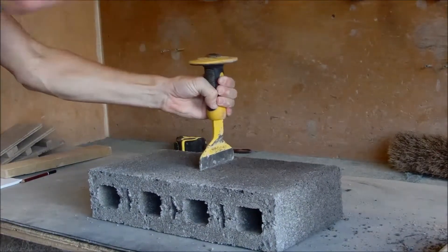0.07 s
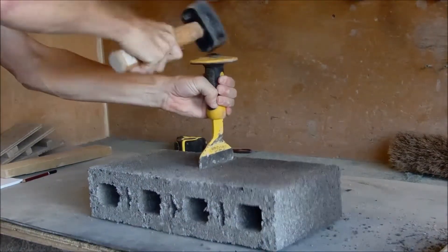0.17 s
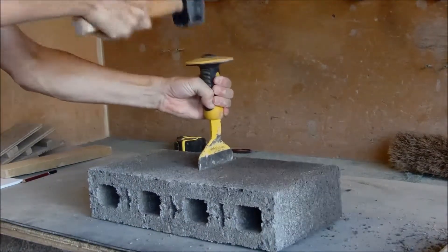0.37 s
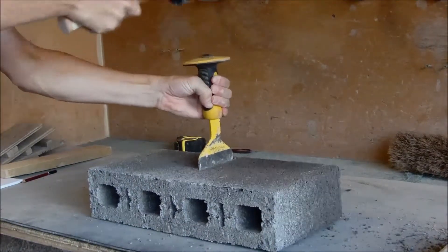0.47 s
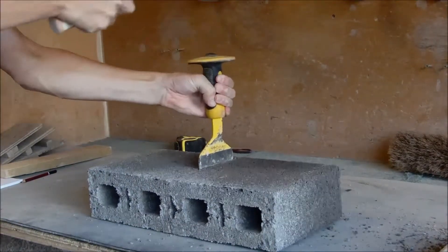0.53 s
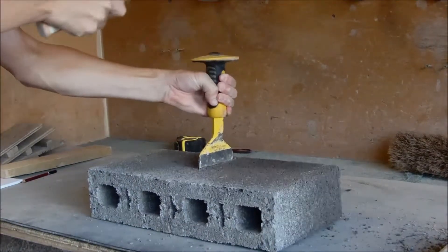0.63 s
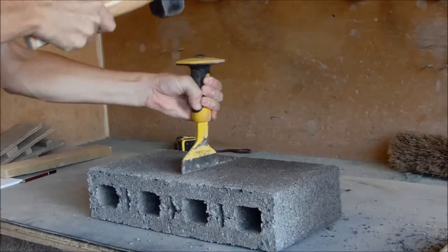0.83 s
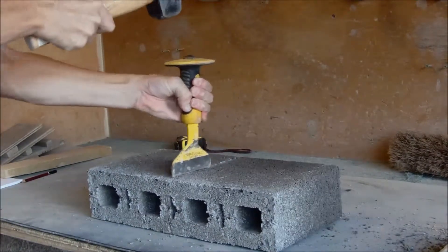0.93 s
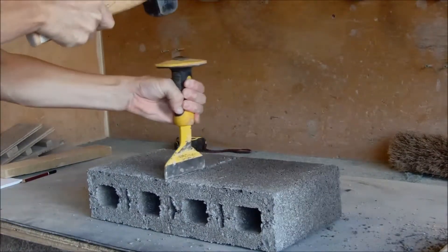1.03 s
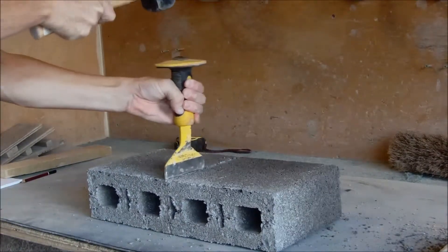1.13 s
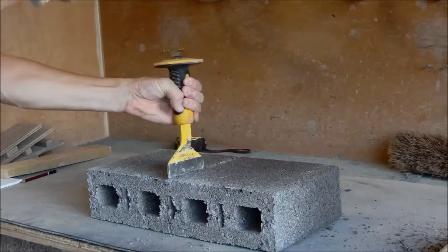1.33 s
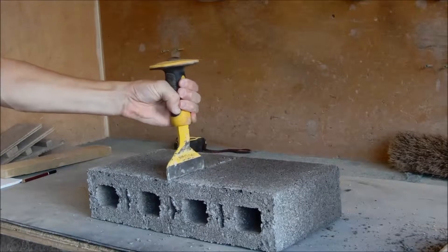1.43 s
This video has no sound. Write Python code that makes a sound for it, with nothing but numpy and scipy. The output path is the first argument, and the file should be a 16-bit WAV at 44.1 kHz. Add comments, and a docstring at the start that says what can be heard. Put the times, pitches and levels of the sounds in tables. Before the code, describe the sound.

One loud hammer blow on a chisel set against concrete cuts into the fading echo of an earlier hit. It rings and dies away in a bare workshop, followed by a faint blade scrape and soft ticks.

```python
"""The dying echo of a hammer blow fills a bare workshop. Then the club hammer drives a steel chisel
into a hollow concrete block again: a crack, a short crunch, the ring of block and chisel,
and a long wash from the room. The blade scrapes faintly as it is moved along.
A few dull ticks follow, over room air and a low hum."""
import sys
import numpy as np
from scipy import signal
from scipy.fft import rfft, irfft
from scipy.io import wavfile

SR = 44100
rng = np.random.default_rng(int(sys.argv[2]) if len(sys.argv) > 2 else 0)


def materialize(psi):
    """Save the field psi as 16-bit PCM at rate SR to the path in sys.argv[1].

    A 1-D psi becomes a single channel; in a 2-D psi each row is a channel.
    """
    bounded = np.clip(np.atleast_2d(psi).T, -1, 1)
    quanta = np.round(bounded * 32767).astype(np.int16)
    wavfile.write(sys.argv[1], SR, quanta)


N = 66150
T = np.arange(N) / SR
BIN_HZ = np.fft.rfftfreq(N, 1 / SR)


# hammer blows: (time [s], gain [dB], ring gain [dB], low-pass cutoff [Hz])
BLOWS = [(-0.2, -10.5, -8, 9000), (0.2145, 1.5, -1, 19200)]

def hammer_blows():
    """Each blow has its own level, ring and brightness; the earlier one is duller."""
    blows = np.zeros(N)
    for start_s, db, ring_db, cutoff_hz in BLOWS:
        age = np.maximum(T - start_s, 0)
        blow = reflections(age) + strike(age, ring_db) + wash(age)
        blows += from_db(db) * signal.lfilter(*signal.butter(1, cutoff_hz, fs=SR), blow)
    return blows


# block and chisel modes: (frequency [Hz], relative level [dB], t60 [s])
BLOCK_CHISEL_MODES = [(692.7, -9.5, 0.062), (737.6, -23, .45), (777, -26.5, 0.54), (888, -20.5, .09),
                      (1025.6, -26, 0.24), (1052, -25.5, 0.36), (1410, -24.5, .22), (1645, -27, .28),
                      (1704, -35.5, .85), (1706, -41, .6), (2020, -37.5, 0.23), (2480, -22.5, 0.086),
                      (2890, -28, .22), (4130, -28, 0.068)]

def strike(age, ring_db):
    """Crack, crunch and the ring of block and chisel."""
    impact = crack(age) + crunch(age) + from_db(ring_db) * ring(BLOCK_CHISEL_MODES, age)
    highpass = signal.butter(2, 290, "high", fs=SR, output="sos")
    return signal.sosfilt(highpass, impact)


# blade bites: (delay [s], relative level [dB])
BITES = [(0.0002, 3), (.0043, -5), (0.0133, -5.5), (0.0162, -8)]
# contact modes: (frequency [Hz], relative level [dB], t60 [s])
CRACK_MODES = [(414, -23.5, 0.036), (1136, -1.5, 0.0045), (2044, -5.5, 0.0056), (3450, -10, .005),
               (5690, -11, 0.0041), (9500, -19, 0.0058)]

def crack(age):
    """The blade bites and judders; each bite excites heavily damped contact modes."""
    bites = np.zeros(N)
    for delay_s, db in BITES:
        bite_age = np.maximum(age - delay_s, 0)
        bites += from_db(db) * rise(bite_age, rise_s=0.00075) * ring(CRACK_MODES, bite_age)
    return bites


# noise bursts: (delay [s], hold [s], relative level [dB])
BURSTS = [(.0005, 0.0014, -16.5), (.0042, 0.0026, -25.5), (0.0107, 0.006, -20), (0.042, 0.0039, -28.5)]
# crunch spectrum: (frequency [Hz], relative density [dB])
CRUNCH_SPECTRUM = [(60, -43), (200, -20), (380, -22), (540, 6), (760, 8), (1250, -2), (1800, 4), (3300, 3),
                   (4600, -13.5), (6600, -6.5), (7900, -19), (9400, -19.5), (11500, -26), (16000, -31)]

def crunch(age):
    """Short noise bursts: the crunch of the blow, then a faint echo off the wall."""
    envelope = sum(from_db(db) * swell(age - delay_s, rise_s=0.0003, hold_s=hold_s, fall_s=0.0034)
                   for delay_s, hold_s, db in BURSTS)
    return envelope * noise(CRUNCH_SPECTRUM)


# reflection spectrum: (frequency [Hz], relative density [dB])
REFLECTION_SPECTRUM = [(50, -40.5), (100, -4), (220, -8.5), (320, -6), (420, -2.5), (560, -11.5),
                       (740, 6.5), (1250, -4), (1700, 4), (2200, -3.5), (2800, 3), (4600, -12),
                       (6600, -10.5), (9400, -20), (11500, -28.5), (16000, -32)]

def reflections(age):
    """First reflections from bench and walls, blurred into one swell of noise."""
    envelope = swell(age, rise_s=0.05, hold_s=0.057, fall_s=0.024)
    return from_db(-19) * envelope * noise(REFLECTION_SPECTRUM)


# reverberation spectrum: (frequency [Hz], relative density [dB])
WASH_SPECTRUM = [(50, -51), (120, -17.5), (300, -14), (450, -6.5), (620, -6.5), (700, 2.5), (770, 3.5),
                 (880, -6.5), (1030, -2), (1250, -8.5), (1540, -7.5), (1720, -0.5), (1900, -13),
                 (2750, -2.5), (3600, -7), (4600, -15), (6600, -17.5), (8200, -25), (9500, -24.5),
                 (11500, -34), (16000, -36)]
# room decay: (band centre [Hz], t60 [s])
ROOM_T60 = [(100, 0.94), (400, 1), (800, 0.95), (1800, 1), (3200, 0.92), (6000, 0.81), (9000, 0.61),
            (15000, .63)]

def wash(age):
    """Diffuse reverberation: overlapping bands, each dying at the room's rate for its pitch."""
    spectrum = rfft(noise(WASH_SPECTRUM))
    centres_hz, t60s = np.transpose(ROOM_T60)
    tail = np.zeros(N)
    for weights, t60 in zip(np.eye(len(centres_hz)), t60s):
        band_gain = at_hz(np.c_[centres_hz, weights], BIN_HZ)
        tail += irfft(spectrum * band_gain, N) * from_db(-60 * age / t60)
    return from_db(-22.5) * rise(age, rise_s=0.017) * tail


# blade-on-block spectrum: (frequency [Hz], relative density [dB])
SCRAPE_SPECTRUM = [(250, -24), (480, 3.5), (750, 6), (1200, 2), (1500, 0), (1750, 6.5), (2100, -2),
                   (3200, -7), (3650, -1.5), (4300, -20), (7000, -20.5), (7600, -14), (8100, -20.5),
                   (16000, -59)]
# blade modes: (frequency [Hz], level [dB], t60 [s])
BLADE_MODES = [(750, -65, 0.9), (1421, -61, .3), (1670, -63.5, 0.74), (2000, -61, 0.18),
               (3597, -61.5, 0.27), (3940, -68, 0.26), (7690, -72, .35)]

def scrape(peak_s=0.91, sigma_s=0.15, catch_s=0.962, catch_fall_s=0.0094):
    """The blade slides along: a soft rasp that swells and fades, with one ringing catch."""
    slide = from_db(-59) * np.exp(-0.5 * ((T - peak_s) / sigma_s) ** 2)
    age = np.maximum(T - catch_s, 0)
    onset = rise(age, rise_s=0.0076)
    catch = from_db(-55) * onset * np.exp(-age / catch_fall_s)
    return (slide + catch) * noise(SCRAPE_SPECTRUM) + onset * ring(BLADE_MODES, age)


# ticks: (time [s], level [dB])
TICKS = [(1.109, -51.5), (1.191, -50.5), (1.322, -51), (1.404, -56)]

def ticks():
    """Faint dull ticks, each a sudden step that relaxes."""
    return sum(from_db(db) * hold_and_fall(T - start_s, hold_s=0, fall_s=0.018) for start_s, db in TICKS)


# room air spectrum: (frequency [Hz], relative density [dB])
AIR_SPECTRUM = [(10, 19.5), (30, 6), (70, 1), (150, -4), (310, -6), (420, -2.5), (800, -2.5), (1600, -7),
                (3200, -12), (4600, -17.5), (7000, -25.5), (8500, -31), (16000, -37)]
# hum tones: (frequency [Hz], rms level [dB])
HUM_TONES = [(386, -72.5), (500, -74), (770, -82.5)]

def background():
    """Room air and a faint steady hum."""
    hum = sum(from_db(db) * np.sqrt(2) * np.sin(2 * np.pi * (hz * T + rng.random()))
              for hz, db in HUM_TONES)
    return from_db(-61) * noise(AIR_SPECTRUM) + hum


def from_db(db):
    """Decibels to gain."""
    return 10 ** (np.asarray(db) / 20)


def at_hz(points, hz):
    """Table lookup on a log-frequency axis."""
    points_hz, values = np.transpose(points)
    return np.interp(np.log(np.maximum(hz, 1)), np.log(points_hz), values)


def noise(spectrum):
    """Coloured noise, rms 1."""
    white = rfft(rng.standard_normal(N))
    coloured = irfft(white * from_db(at_hz(spectrum, BIN_HZ)), N)
    return coloured / coloured.std()


def ring(modes, age):
    """Damped sines set off together, with alternating signs."""
    return sum((-1) ** k * from_db(db - 60 * age / t60) * np.sin(2 * np.pi * hz * age)
               for k, (hz, db, t60) in enumerate(modes))


def rise(age, rise_s):
    """Envelope: exponential approach from 0 to 1."""
    return 1 - np.exp(-np.maximum(age, 0) / rise_s)


def hold_and_fall(age, hold_s, fall_s):
    """Envelope: step, hold, exponential decay."""
    return (age > 0) * np.exp(-np.maximum(age - hold_s, 0) / fall_s)


def swell(age, rise_s, hold_s, fall_s):
    """Envelope: rise, then exponential decay from hold_s on."""
    return rise(age, rise_s) * hold_and_fall(age, hold_s, fall_s)


def scene():
    """Blows, scrape, ticks and background, in mono."""
    return (hammer_blows() + scrape() + ticks() + background())[None]


# microphone dips: (frequency [Hz], width [Hz])
MIC_DIPS = [(3950, 75), (7850, 420)]

def record(dry, cutoff_hz=15900):
    """Microphone response: two narrow dips and a steep treble cut."""
    for hz, width_hz in MIC_DIPS:
        dry = signal.lfilter(*signal.iirnotch(hz, hz / width_hz, fs=SR), dry)
    lowpass = signal.ellip(10, 0.2, 80, cutoff_hz, fs=SR, output="sos")
    return signal.sosfilt(lowpass, dry)


dry = scene()
out = record(dry)
materialize(out)
```